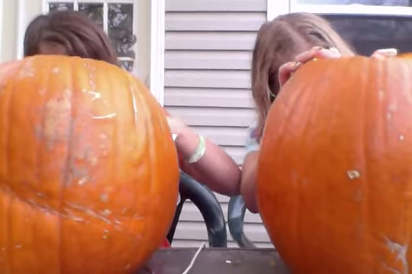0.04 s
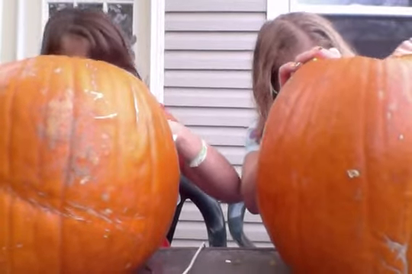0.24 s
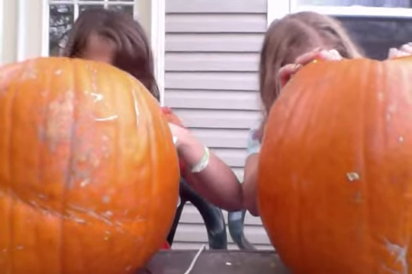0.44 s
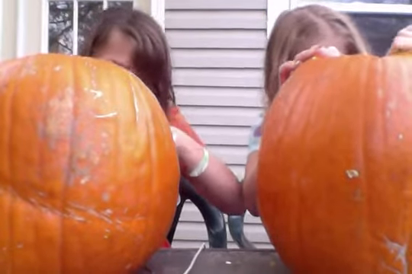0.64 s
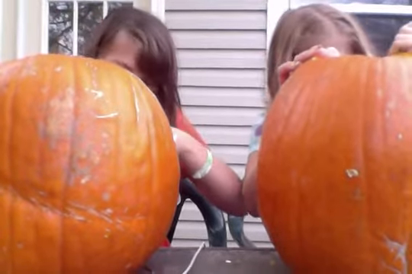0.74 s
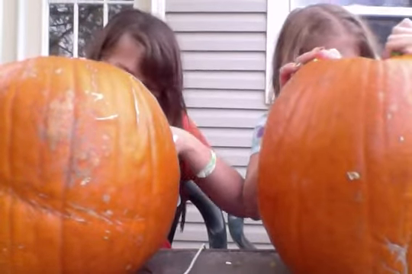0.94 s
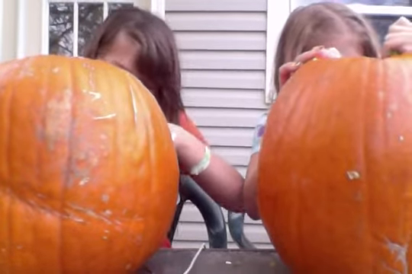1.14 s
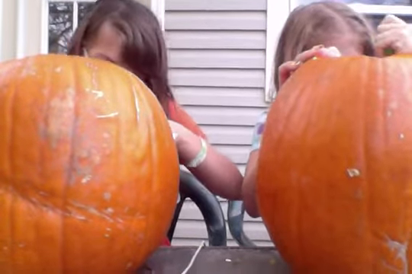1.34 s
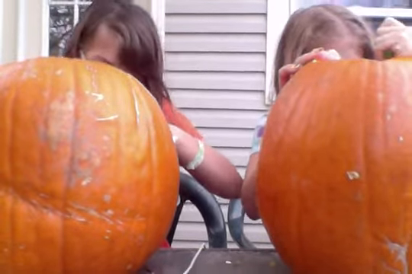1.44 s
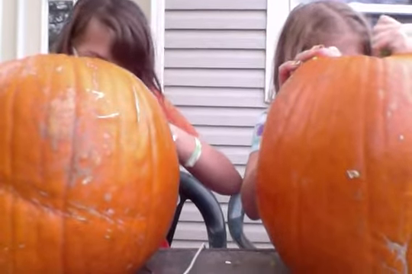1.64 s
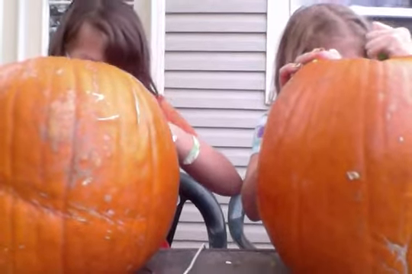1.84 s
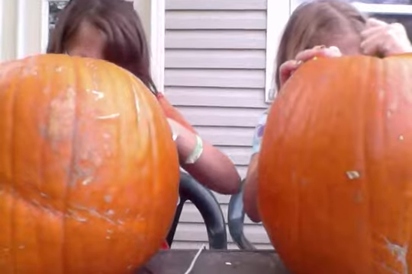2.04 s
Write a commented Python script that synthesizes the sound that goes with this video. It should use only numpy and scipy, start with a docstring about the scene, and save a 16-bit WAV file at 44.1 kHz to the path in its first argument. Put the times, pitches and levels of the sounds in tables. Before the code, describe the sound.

Pumpkin carving up close: blade clacks, dull hollow thumps and fibrous crunching in a quiet yard

```python
"""At an outdoor table in a quiet yard, a small knife saws into a hollow pumpkin, heard up close.
Clacks ring bunches of shell modes behind a falling zip; knocks are short sinking swings of the shell.
Tearing fibres crunch as bursts of dense snaps, and the shaken table rumbles as lumpy low noise.
Under it lie steady yard noise, a thin sliding sine for a bird whistle and faint noise puffs of the blade.
A short noise tail echoes the clacks, knocks and crunches."""
import sys
import numpy as np
from scipy import signal
from scipy.fft import rfft, irfft
from scipy.io import wavfile
from scipy.ndimage import uniform_filter1d

SR = 44100
rng = np.random.default_rng(int(sys.argv[2]) if len(sys.argv) > 2 else 0)


def inscribe(sig):
    """Save sig as 16-bit PCM at rate SR to the path in sys.argv[1].

    A 1-D sig is mono; a 2-D sig holds one channel per row.
    Samples are clipped to [-1, 1] before scaling.
    """
    pcm = np.round(np.clip(np.atleast_2d(sig).T, -1, 1) * 32767)
    wavfile.write(sys.argv[1], SR, pcm.astype(np.int16))


N = 92610
T = np.arange(N) / SR


def amp(db):
    """Turns decibels into an amplitude factor."""
    return 10 ** (np.asarray(db) / 20)


def evened(x):
    """Scales to an rms of one."""
    return x / np.sqrt(np.mean(x ** 2) + 1e-20)


def add(mix, s, sound):
    """Lays a sound into the mix at s seconds, cut at the end."""
    part = mix[round(s * SR):][:len(sound)]
    part += sound[:len(part)]


def colour(x, points):
    """Filters by a spectrum, power kept for white input."""
    f, db = np.transpose(points)
    log_hz = np.log(np.fft.rfftfreq(N, 1 / SR) + 1)
    gain = amp(np.interp(log_hz, np.log(f), db, left=-80, right=-80))
    return irfft(rfft(x) * evened(gain), N)


# spectrum of the yard noise: f/Hz, relative level/dB per Hz
YARD_SPECTRUM = [(15, -50), (25, -61), (113, 4), (148, 1), (281, -7.5), (445, -6.5), (684, -10.5),
                 (762, -8.5), (1050, -10), (1450, -8), (5140, -15.5), (15500, -42)]
YARD_DB = -66.5  # rms


def yard():
    """Steady noise of the open air, weighted towards the lows."""
    return amp(YARD_DB) * colour(rng.standard_normal(N), YARD_SPECTRUM)


# bird whistles: start t/s, length t/s, starting level/dB, start f/Hz, end f/Hz
WHISTLES = [(1.407, .15, -54, 3400, 3353), (1.59, 0.092, -64.5, 3340, 3220)]
WHISTLE_FALL_DB, WHISTLE_RISE_S = -8.5, 0.016  # level change over the whistle; fade-in


def bird():
    """Thin sine whistles that sink in pitch and level."""
    out = np.zeros(N)
    for s, length, db, hz, end_hz in WHISTLES:
        t = np.arange(0, length, 1 / SR)
        edge = np.minimum(np.minimum(t / WHISTLE_RISE_S, (length - t) / 0.003), 1)
        level = amp(db + WHISTLE_FALL_DB * t / length)
        pitch = hz + (end_hz - hz) * t / length
        add(out, s, edge * level * np.sin(2 * np.pi * np.cumsum(pitch) / SR))
    return out


# blade swishes: start t/s, rise t/s, fade time constant t/s, level/dB, centre f/Hz, half-width f/Hz
SWISHES = [(0.492, 0.042, 0.054, -67, 8800, 8500), (.52, 0.0088, 0.014, -80, 10800, 970),
           (0.653, 0.013, 0.056, -65, 8800, 8430), (.66, 0.0032, 0.0091, -74, 9700, 600),
           (0.989, .005, 0.0092, -72, 7560, 1200), (1.005, 0.011, .01, -68, 7060, 600),
           (1.27, 0.047, 0.06, -74.5, 8700, 8000)]


def swishes():
    """Brief puffs of high noise that swell and fade."""
    out = np.zeros(N)
    for s, rise, fade, db, hz, width in SWISHES:
        band = [(max(hz - width, 500), -14), (hz, 0), (hz + width, -18)]
        noise = colour(rng.standard_normal(N), band)
        swell = np.clip((T - s) / rise, 0, 1)
        dying = np.exp(-np.maximum(T - s - rise, 0) / fade)
        out += amp(db) * swell * dying * noise
    return out


# pushes that shake the table: start t/s, level before lumps/dB, rise t/s, fall by 60 dB t/s
SHAKES = [(0, -60.5, 0.029, 0.45), (0.043, -54, 0.01, 0.27), (0.219, -38, 0.009, 0.25),
          (0.277, -35, 0.017, 0.077), (.318, -41.5, 0.012, 0.14), (0.401, -49, 0.005, 0.24),
          (0.498, -59.5, 0.035, 0.6), (0.587, -53.5, 0.017, 0.37), (0.711, -64.5, 0.0044, 0.9),
          (0.809, -63, 0.017, 0.52), (0.994, -63, 0.053, 0.85), (1.085, -48.5, 0.045, 0.11),
          (1.24, -43.5, 0.013, 0.22), (1.267, -41, 0.0083, 0.28), (1.43, -48.5, 0.021, 0.27),
          (1.463, -50.5, 0.015, 0.23), (1.52, -56, 0.0098, 0.36), (1.571, -57.5, .01, 0.25),
          (1.664, -48.5, 0.017, 0.42), (1.732, -40, 0.009, 0.27), (1.8, -50, 0.023, 0.32),
          (1.92, -64, 0.01, 0.64)]
# spectrum of the table rumble: f/Hz, relative level/dB per Hz
TABLE_SPECTRUM = [(15, -54), (25, -24), (60, -17), (163, -8), (237, -1.5), (372, -13), (502, -10),
                  (798, -21.5), (900, -19), (1170, -43), (1980, -120)]
LUMP_DB = 2  # rms wander of the level


def shake():
    """Lumpy low rumble of the table, swelling and dying with each push."""
    power = np.zeros(N)
    for s, db, rise, t60 in SHAKES:
        swell = np.clip((T - s) / rise, 0, 1)
        dying = amp(-60 * np.maximum(T - s - rise, 0) / t60)
        power += (amp(db) * swell * dying) ** 2
    slow_noise = uniform_filter1d(uniform_filter1d(rng.standard_normal(N), 300), 300)
    lumps = amp(LUMP_DB * evened(slow_noise))
    rumble = evened(colour(rng.standard_normal(N), TABLE_SPECTRUM))
    return np.sqrt(power) * lumps * rumble


# dull knocks of hand and handle: peak t/s, peak level/dB, f at the peak/Hz, swing length t/s
KNOCKS = [(0.074, -41, 160, 0.0093), (0.2163, -27, 377, 0.012), (0.228, -27.5, 258, 0.0035),
          (0.295, -30, 270, 0.014), (.597, -34, 455, 0.005), (1.092, -47.5, 216, 0.031),
          (1.117, -39.5, 382, 0.0078), (1.239, -28, 376, 0.01), (1.254, -42, 270, 0.012),
          (1.301, -30, 233, 0.0046), (1.312, -36, 198, .008), (1.436, -35.5, 450, 0.0049),
          (1.534, -43.5, 307, 0.011), (1.574, -38.5, 310, 0.0041), (1.6542, -31.5, 367, 0.009),
          (1.669, -31.5, 288, 0.0029), (1.743, -36, 281, 0.013), (1.761, -40.5, 248, 0.012)]
KNOCK_RISE = 0.63  # length scale of the rise against that of the fall
KNOCK_SAG, KNOCK_SAG_S = 0.22, 0.0029  # pitch sinks from this share above to as much below; glide time
KNOCK_TOP, KNOCK_TOP_DB = 2.43, -21.5  # overtone ratio and level
KNOCK_LEAD_S = 2000 / SR  # room for the rise ahead of the peak


def knocks():
    """A few soft swings of the hollow shell, quick to rise, sinking in pitch, peaking on their time."""
    out, t = np.zeros(N), T[:4000] - KNOCK_LEAD_S
    for s, db, hz, length in KNOCKS:
        rise = np.exp(-(2 * t / (length * KNOCK_RISE)) ** 4)
        fall = np.exp(-(2 * t / length) ** 2)
        swing = np.where(t < 0, rise, fall)
        turns = hz * (t - KNOCK_SAG * KNOCK_SAG_S * np.log(np.cosh(t / KNOCK_SAG_S)))
        overtone = amp(KNOCK_TOP_DB) * np.sin(2 * np.pi * KNOCK_TOP * turns)
        wave = np.cos(2 * np.pi * turns) + overtone
        add(out, s - KNOCK_LEAD_S, amp(db) * swing * wave)
    return out


# fibres tearing: start t/s, level before rise and fade/dB, fade time constant t/s, treble tilt/dB per octave
CRUNCHES = [(0.283, -31.5, 0.0065, -14), (0.29, -30.5, 0.0081, 6), (.316, -27.5, 0.0068, 3),
            (0.323, -74, 0.0067, -3), (0.382, -37.5, 0.0059, -29), (0.403, -37.5, 0.0027, -23),
            (1.078, -60, 0.0035, 15), (1.109, -55.5, 0.0041, 13), (1.276, -58, 0.0083, 11),
            (1.284, -56.5, 0.019, -4), (1.5656, -53, .006, -1), (1.735, -50.5, 0.0064, -26),
            (0.583, -62, 0.018, -28), (1.416, -61.5, 0.011, 3), (1.47, -60, 0.0086, -7)]
# spectrum of a crunch before its tilt: f/Hz, relative level/dB per Hz
CRUNCH_SPECTRUM = [(710, -27), (1200, -21), (1620, -4.5), (2570, -17), (2920, -26), (3350, -7.5),
                   (3940, -14.5), (5850, -15), (6110, -20), (15500, -54)]
TILT_FROM_HZ = 5900
GRAIN_DB, GRAINS_PER_S, BITE_S = -0.5, 14000, 0.0031  # size spread, density, rise time


def crunch():
    """Dense snaps of slightly uneven size that swell and die away with each bite of the blade."""
    size = amp(GRAIN_DB * np.minimum(rng.exponential(1, N), 4))
    sign = rng.choice([-1, 1], N)
    struck = rng.random(N) < GRAINS_PER_S / SR
    snaps = evened(size * sign * struck)
    out = np.zeros(N)
    for s, db, length, tilt_db in CRUNCHES:
        t = np.maximum(T - s, 0)
        tone = [(f, v + tilt_db * max(np.log2(f / TILT_FROM_HZ), 0)) for f, v in CRUNCH_SPECTRUM]
        bite = np.minimum(t / BITE_S, 1) * np.exp(-t / length)
        out += colour(amp(db) * bite * snaps, tone)
    return out


# blade clacks on the shell, levels before the top cut: start t/s, peak level of the high modes/dB,
# peak level of the low modes/dB, rattle time constant t/s, tilt of the high modes/dB per octave
CLACKS = [(0.2394, -33.5, -51.5, 0.0035, 2), (0.254, -35.5, -39, 0.0018, 10),
          (0.2727, -32.5, -55, 0.0016, 13), (0.2856, -25, -36, 0.0039, 11), (0.2913, -24, -37, 0.0038, 14),
          (.302, -30, -49, 0.0016, 9), (0.317, -34.5, -36.5, 0.0065, -15), (0.326, -46, -44.5, 0.0019, 2),
          (0.382, -28, -46.5, 0.0019, 6), (0.4028, -33.5, -43.5, 0.0044, 9),
          (0.5881, -27.5, -39.5, 0.0028, 5), (0.6, -38, -36, 0.0037, 3), (1.11, -51.5, -68, .004, 3),
          (1.2453, -54.5, -61, 0.0023, 3), (1.2632, -35.5, -52, 0.0024, 5.5),
          (1.2775, -38, -51.5, 0.002, -11), (1.295, -42, -48, 0.0035, -10), (1.429, -36.5, -44.5, 0.002, 3),
          (1.4602, -33.5, -41.5, 0.0044, 5.5), (1.572, -53, -58.5, .003, 6), (1.676, -38, -54, 0.0086, 0),
          (1.689, -63, -48.5, 0.006, -22.5), (1.731, -27.5, -35.5, 0.0049, -1),
          (1.773, -34, -40, 0.0014, -3), (1.7985, -47, -45, 0.001, -4), (1.822, -41.5, -54.5, 0.0054, 1),
          (1.852, -55.5, -59, 0.0031, 9)]
# shell modes a clack rings: f/Hz, relative level/dB, fall by 60 dB t/s
SHELL_MODES = [(377, -5, 0.11), (474.3, 2.5, 0.078), (558, -1, 0.042), (948, -8, 0.035),
               (1032.3, -5.5, 0.13), (1243, -1, 0.026), (1452, -8, 0.022), (1760, -7, 0.089),
               (2005, -6, 0.097), (2235, 4.5, 0.049), (2625, 1.5, 0.034), (2896, -13.5, 0.032),
               (3123, 2.5, 0.027), (3417, 6, 0.023), (4154, -20, 0.051), (4250, -13.5, 0.038)]
LOW_MODES_UNDER_HZ, SHELL_TOP_HZ = 1350, 4350  # split of low and high modes; top cut
PARTIALS, CLUSTER = 8, 0.075  # each mode is a bunch of close partials, up to this share off either way
MODE_SPREAD_DB, TILT_AROUND_HZ = 1, 2600
LAG_S, LAG_POWER = 0.0015, 1.19  # rise time at 2 kHz; low bending waves arrive later
STRIKE = 2.25  # first contact against the rattle
# the first wave through the shell is a falling zip: level is against the peak of the high modes
ZIP_HZ, ZIP_END_HZ, ZIP_S, ZIP_DB, ZIP_T60 = 4181, 1795, 0.004027, -9.5, 0.05


def clacks():
    """A strike and a short rattle ring bunches of shell modes, treble first, each blow on another spot."""
    out, t = np.zeros(N), T[:5000]
    hz, db, t60 = np.repeat(SHELL_MODES, repeats=PARTIALS, axis=0).T[:, :, None]
    low = hz[:, 0] < LOW_MODES_UNDER_HZ
    chance = rng.random((len(CLACKS), 3, len(hz), 1))
    rattle = rng.standard_normal((len(CLACKS), 1500))
    rise = 1 - np.exp(-(t / (LAG_S * (2000 / hz) ** LAG_POWER)) ** 2)
    zip_hz = ZIP_END_HZ + (ZIP_HZ - ZIP_END_HZ) * np.exp(-t / ZIP_S)
    zip_wave = amp(-60 * t / ZIP_T60) * np.sin(2 * np.pi * np.cumsum(zip_hz) / SR)
    for (s, top_db, low_db, length, tilt_db), (spot, tune, phase), noise in zip(CLACKS, chance, rattle):
        tilt = ~low[:, None] * tilt_db * np.log2(hz / TILT_AROUND_HZ)
        level_db = db + MODE_SPREAD_DB * (2 * spot - 1) + tilt
        partial_hz = hz * (1 + CLUSTER * (2 * tune - 1))
        waves = np.sin(2 * np.pi * (partial_hz * t + phase))
        rings = rise * amp(level_db - 60 * t / t60) * waves
        push = noise * np.exp(-t[:1500] / max(length, 1e-4))
        push[0] = STRIKE
        add(out, s, amp(top_db + ZIP_DB) * zip_wave)
        for part, peak_db in ((low, low_db), (~low, top_db)):
            ring = signal.fftconvolve(rings[part].sum(0), push)
            add(out, s, amp(peak_db) * ring / abs(ring).max())
    return signal.sosfilt(signal.butter(8, SHELL_TOP_HZ, fs=SR, output="sos"), out)


ECHO_DB, ECHO_T60 = -12, 0.22  # level of the tail; seconds to fall by 60 dB


def echo(near):
    """Dense decaying reflections as a noise tail, starting 6 ms after the sound."""
    t = T[:SR // 2]
    tail = rng.standard_normal(SR // 2) * amp(-60 * t / ECHO_T60) * (t > .006)
    return amp(ECHO_DB) * signal.fftconvolve(near, tail / np.linalg.norm(tail))[:N]


def scene():
    """Sets the echoed knife work over the table, swishes, bird and yard."""
    near = clacks() + knocks() + crunch()
    return (near + echo(near) + shake() + swishes() + bird() + yard())[None]


MIC_LOW_HZ, EDGE_HZ = 72.5, 15700  # bass cut and upper band limit


def record(dry):
    """The microphone drops the deepest bass; then the band limit."""
    thin = signal.sosfilt(signal.butter(3, MIC_LOW_HZ, "high", fs=SR, output="sos"), dry)
    band_limit = signal.firwin(511, EDGE_HZ, window=("kaiser", 9), fs=SR)
    return signal.oaconvolve(thin, band_limit[None], "same")


dry = scene()
out = record(dry)
inscribe(out)
```